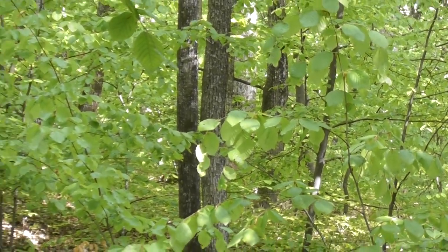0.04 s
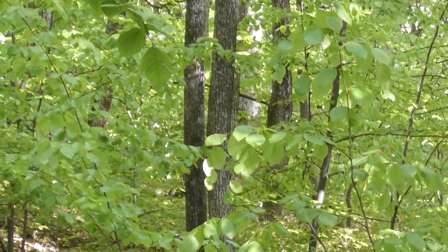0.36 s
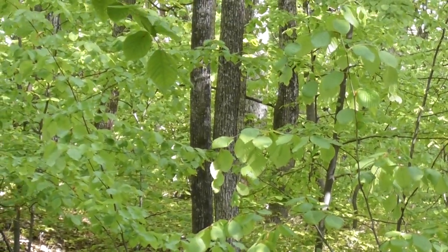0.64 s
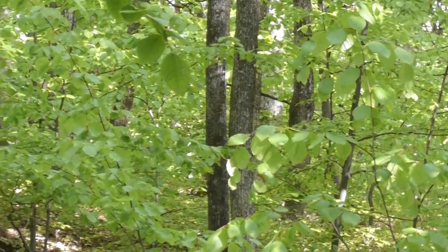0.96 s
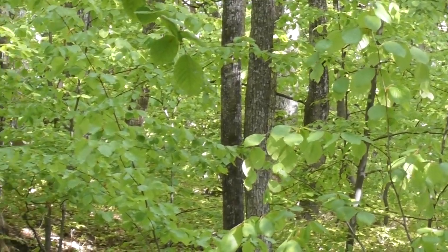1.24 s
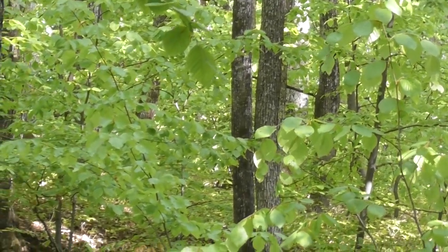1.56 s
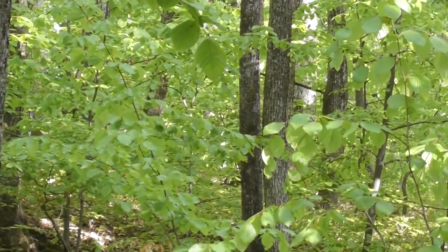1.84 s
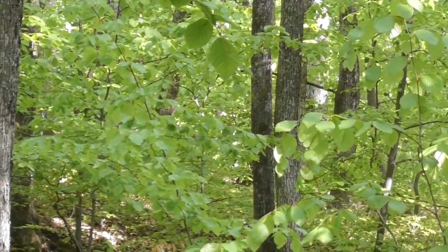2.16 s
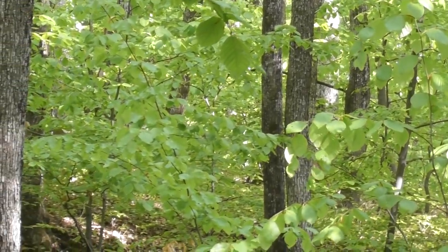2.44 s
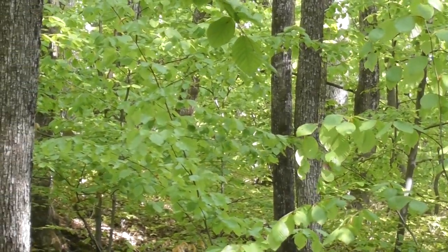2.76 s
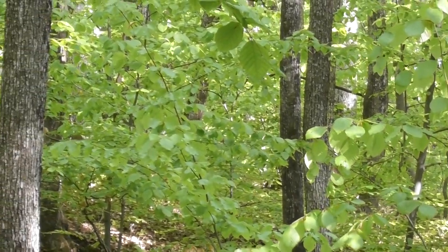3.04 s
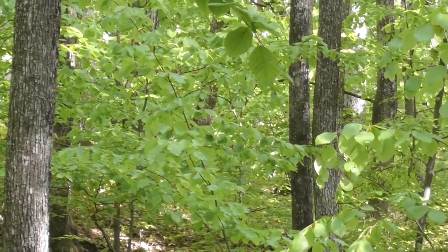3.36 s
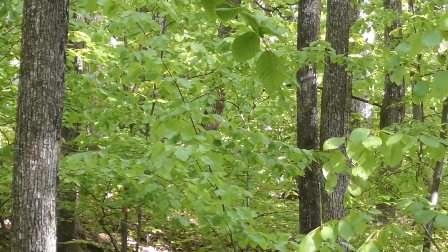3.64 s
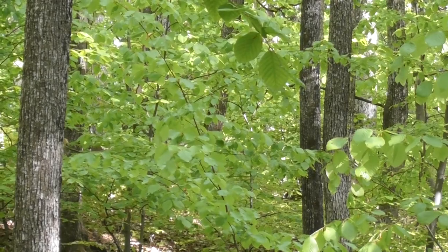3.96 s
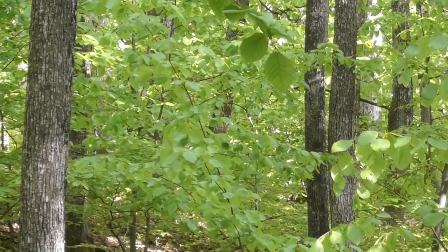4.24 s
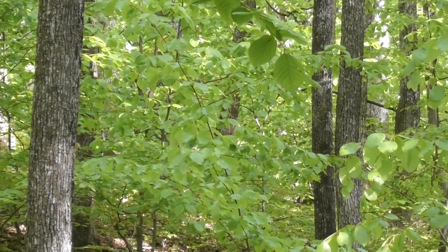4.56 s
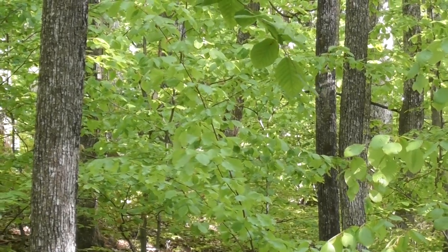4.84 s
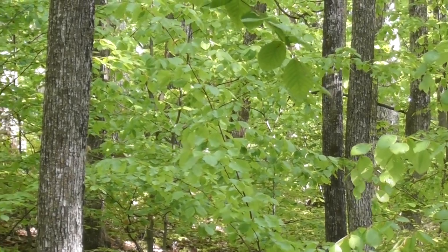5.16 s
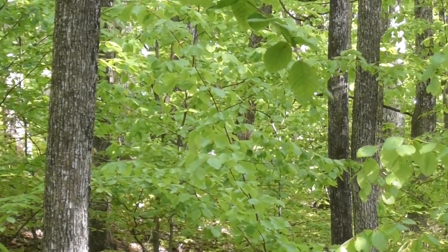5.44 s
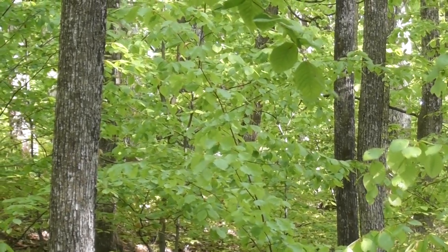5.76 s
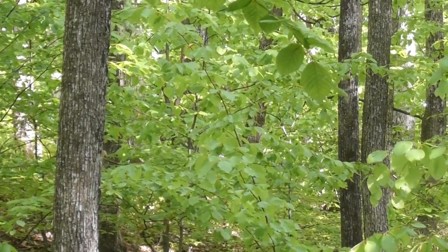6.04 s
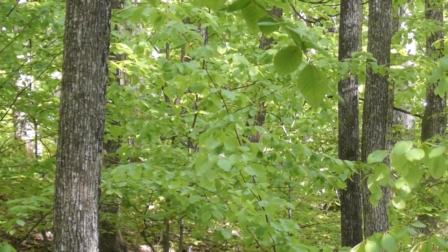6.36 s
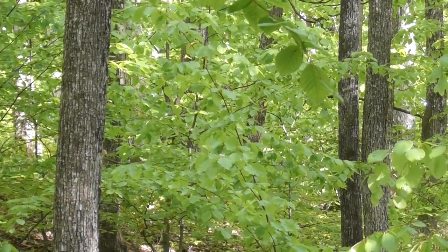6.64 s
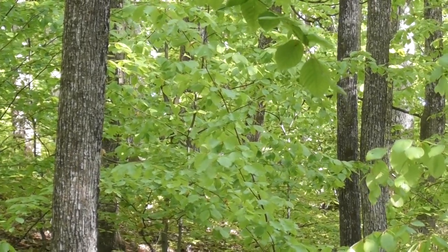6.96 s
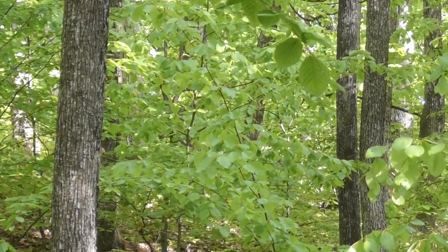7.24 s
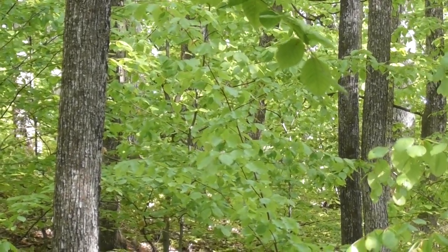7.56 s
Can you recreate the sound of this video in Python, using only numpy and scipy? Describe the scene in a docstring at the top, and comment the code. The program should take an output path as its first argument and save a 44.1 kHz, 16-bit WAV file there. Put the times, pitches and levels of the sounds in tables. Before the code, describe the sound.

Two hoarse, low barks from a far-off deer ring through the woods, one early and one right at the end, louder than everything else. Throughout, one bird gives evenly spaced, rising trilled calls, with faint chips and whistles from other birds around it. A low rumble lies underneath, while tiny dry twig ticks and a faint lens motor buzz sound near the microphone.

```python
"""A deer barks twice, hoarsely, far off in a leafy forest: its vocal folds chop a blast of air that
rings in its throat, and the tree trunks scatter each bark into a long echo. One bird repeats a rising,
trilled call, a smaller one chips, and distant ones whistle and twitter over a low, far rumble.
Close by, leaves and twigs tick and rustle, and the camera's lens motor buzzes faintly in tiny steps."""
import sys
import numpy as np
from scipy import signal
from scipy.fft import rfft, irfft, next_fast_len
from scipy.io import wavfile

SR = 44100
rng = np.random.default_rng(int(sys.argv[2]) if len(sys.argv) > 2 else 0)


def digitize_waveform(pressure):
    """Quantize a signal to 16-bit integers and store it at the path in sys.argv[1].

    Rows of a 2-D input are taken as channels; values are limited to [-1, 1].
    """
    field = np.atleast_2d(pressure).T
    bounded = np.clip(field, -1, 1)
    quanta = np.round(bounded * 32767).astype(np.int16)
    wavfile.write(sys.argv[1], SR, quanta)


N = 334719
TIME = np.arange(N) / SR


def from_db(db):
    """Turn decibels into a number to multiply a sound by."""
    return 10 ** (np.asarray(db) / 20)


def rms_one(x):
    """Scale a sound so that its average strength (rms) is 1."""
    return x / np.sqrt(np.mean(x ** 2) + 1e-20)


def along(rows, at, column=1):
    """Read a column of a table, joining its rows with straight lines."""
    rows = np.array(rows)
    return np.interp(at, rows[:, 0], rows[:, column])


def at_hz(points, hz):
    """Read a table by frequency, giving each octave the same room."""
    points = np.array(points)
    return np.interp(np.log(hz + 1), np.log(points[:, 0]), points[:, 1])


def add(track, start_s, sound):
    """Mix a sound into a track at a given time."""
    start = int(np.clip(round(start_s * SR), 0, N - 1))
    track[start:start + len(sound)] += sound[:N - start]


def drift(rate_hz):
    """A curve that wanders by about 1, reaching a new random value rate_hz times a second."""
    return np.interp(TIME * rate_hz, np.arange(8192), rng.standard_normal(size=8192))


def progress(length_s):
    """A line that runs from 0 to 1 in the given time."""
    return np.linspace(0, 1, int(length_s * SR))


def swell(t, length_s, attack_s, release_s):
    """A loudness curve that rises from 0, holds at 1 and is back at 0 after length_s."""
    return np.clip(np.minimum(t / attack_s, (length_s - t) / release_s), 0, 1)


def spells(rows, at, ramp_s):
    """A loudness curve that is on for each row (start_s, end_s, level_db); the loudest row wins."""
    gains = [from_db(db) * swell(at - start, end - start, ramp_s, ramp_s) for start, end, db in rows]
    return np.max(gains, axis=0)


def tone(hz):
    """A pure tone of average strength 1 that follows a pitch curve."""
    return np.sqrt(2) * np.sin(2 * np.pi * np.cumsum(hz) / SR)


def resonate(x, hz, width_hz):
    """Let a sound ring at one frequency, which passes unchanged while the rest is weakened."""
    r = np.exp(-np.pi * width_hz / SR)
    feedback = [1, -2 * r * np.cos(2 * np.pi * hz / SR), r * r]
    return signal.lfilter(np.array([1, 0, -1]) * (1 - r * r) / 2, feedback, x + 1e-18)


def resonate_twice(x, hz, width_hz):
    """Ring twice over, so that much less gets through away from the peak."""
    return resonate(resonate(x, hz, width_hz), hz, width_hz)


def stereo(mid, side, likeness):
    """Mix two noises into left and right, from unrelated (likeness 0) to the same (1)."""
    alike = np.clip(likeness, 0, 1)
    return np.sqrt(1 + alike) * mid + np.sqrt(1 - alike) * side * np.array([[1], [-1]])


def panned(x, left_db):
    """Make the left channel louder than the right by left_db."""
    return x * from_db(left_db * np.array([[1], [-1]]) / 2)


def stereo_noise(spectrum):
    """Noise from all around with a given tone colour and an average strength of 1."""
    # how alike left and right are: frequency_hz, likeness (0 to 1)
    likeness = [(30, 0.94), (100, 0.94), (220, .99), (330, 0.86), (500, 0.3), (1000, 0.42), (2000, 0.98),
                (4000, 1), (6000, 1), (9000, 0.81), (13000, 0.17)]
    padded = next_fast_len(N)
    mid, side = rfft(rng.standard_normal((2, padded)))
    hz = np.arange(len(mid)) * SR / padded
    coloured = stereo(mid, side, at_hz(likeness, hz)) * from_db(at_hz(spectrum, hz))
    return rms_one(irfft(coloured * 1, padded)[:, :N])


def background(rush_db=-62.0, rush_swell_db=-0.2, hiss_db=-66.0):
    """Far rumble, the soft rush of the woods with a faint steady camera whine, and microphone hiss."""
    # loudness of the two rumble bands: time_s, deep_db, upper_db
    rumble_levels = [(0.0, -46, -44.5), (1.0, -49, -47.5), (2.3, -47.5, -44), (3.1, -46.5, -49),
                     (3.7, -49.0, -45.5), (4.25, -50.5, -51), (4.7, -46, -47.5), (5.6, -45.5, -47),
                     (6.3, -42, -45.5), (7.59, -43.5, -41.5)]
    # tone colour of each of the four noises: frequency_hz, relative_db
    deep_colour = [(15, -36), (28, -7.5), (45, -4.5), (68, 5), (97, 8.5), (125, 2.5), (160, 0),
                   (260, -58.5)]
    upper_colour = [(90, -26), (140, -7), (185, 2.5), (220, 3.5), (255, -3.5), (295, -7.5), (340, -16.5),
                    (450, -50)]
    rush_and_whine_colour = [(200, -11.5), (380, 2.5), (600, -1.5), (850, -4.5), (1200, -12.5), (1680, -21),
                             (1920, -11), (2180, -18.5), (2800, -25), (3600, -15), (4300, -26.5),
                             (6000, -50)]   # the peak near 1.9 kHz is the camera's whine
    hiss_colour = [(2000, -15), (4500, -1.5), (6200, -4.5), (7300, 3.5), (8450, 8), (9400, 3.5),
                   (12000, 3.5), (15700, 4)]
    deep = from_db(along(rumble_levels, TIME)) * stereo_noise(deep_colour)
    upper = from_db(along(rumble_levels, TIME, column=2)) * stereo_noise(upper_colour)
    rush_and_whine = from_db(rush_db + rush_swell_db * drift(2.175)) * stereo_noise(rush_and_whine_colour)
    hiss = from_db(hiss_db) * stereo_noise(hiss_colour)
    return deep + upper + rush_and_whine + hiss


def lens_motor(steps_per_s=50, step_s=0.0052, first_hz=2450, last_hz=1200, detune_share=0.066,
               uneven_db=1.3, rattle_db=-5, blip_db=-2):
    """Each motor step is a tiny falling blip with a little rattle, and leaves the housing ringing."""
    # a quiet creep with louder runs on top: start_s, end_s, drive_db
    runs = [(0, 5.3, -73.5), (0, 0.35, -66.5), (.35, 1.05, -63.5), (2.55, 2.7, -64), (3.55, 4.16, -64.5)]
    # strong and weak steps, repeating in fives: relative_db
    accents = [-6, -2, -7, -3, -3]
    # where the lens housing rings: frequency_hz, width_hz, gain_db
    housing = [(1380, 40, 20), (1900, 85, 7), (2080, 250, 0), (3450, 600, 6)]
    blips, u = np.zeros(N), progress(step_s)
    starts = np.arange(0, TIME[-1] - 1 / steps_per_s, 1 / steps_per_s)
    accent_db = np.resize(accents, len(starts)) + uneven_db * rng.standard_normal(len(starts))
    strengths = spells(runs, starts, ramp_s=.04) * from_db(accent_db)
    shape = np.sin(np.pi * u ** 0.6)
    for start_s, strength, detune in zip(starts, strengths, rng.standard_normal(len(starts))):
        pitch = np.geomspace(first_hz, last_hz, len(u)) * (1 + detune_share * detune)
        add(blips, start_s, strength * shape * tone(pitch))
    rattle = from_db(rattle_db) * np.abs(blips) * rng.standard_normal(N)
    ringing = sum(from_db(db) * resonate(blips + rattle, hz, width) for hz, width, db in housing)
    return from_db(blip_db) * blips + ringing


def leaf_rustles(centre_hz=7200, width_hz=2000, clump_db=4):
    """Leaves brush each other in a fine, clumped crackle."""
    # brief high rustles: start_s, end_s, level_db
    rustles = [(.235, .265, -65), (.285, .34, -65.5)]
    grit = rng.standard_normal(N) * from_db(clump_db * drift(400))
    return spells(rustles, TIME, ramp_s=0.015) * rms_one(resonate_twice(grit, centre_hz, width_hz))


def twig_ticks(rise_s=0.00087, snap_s=0.0012, crumble_db=-24, crumble_s=0.015, clump_db=5,
               width_share=0.36, faint_count=7, faint_db=-51.5, faint_hz=8200):
    """A leaf or twig gives a dry snap, then a weaker crumbling in small clumps."""
    # the main ticks: start_s, peak_db, centre_hz
    main_ticks = [(.081, -48, 8200), (2.699, -51, 2140), (3.331, -52, 8370), (3.721, -48.5, 7600),
                  (4.228, -49.5, 7950), (4.315, -49, 7950), (4.411, -44.5, 7300), (4.424, -52, 8000),
                  (4.636, -44, 7530), (5.828, -46.5, 8570), (5.888, -42.5, 8500)]
    out, t = np.zeros(N), TIME[:SR // 20]
    clumps = from_db(clump_db * drift(400))
    faint_starts = rng.uniform(0, TIME[-1] - t[-1], faint_count)
    ticks = main_ticks + [(start_s, faint_db, faint_hz) for start_s in faint_starts]
    rise = 1 - np.exp(-(t / rise_s) ** 2)
    for (start_s, db, hz), grit in zip(ticks, rng.standard_normal((len(ticks), len(t)))):
        crumble = from_db(crumble_db) * np.exp(-t / crumble_s) * clumps[int(start_s * SR):][:len(t)]
        shape = rise * (np.exp(-t / snap_s) + crumble)
        snap = resonate_twice(grit * shape, hz, width_share * hz)
        add(out, start_s, from_db(db) * snap / np.abs(snap).max())
    return out


def forest_echo(x, direct_db, build_s, fade_s, late_db, late_fade_s, likeness=.95):
    """Echoes off near trunks build up and die away; far trunks return a longer tail."""
    t = TIME[:2 * SR]
    # each fade time is how long that part takes to drop by 60 dB
    fade = from_db(-60 * t / fade_s) + from_db(late_db - 60 * t / late_fade_s)
    build = 1 - np.exp(-t / build_s)
    echo = stereo(*rng.standard_normal((2, len(t))), likeness) * fade * build
    echo = echo / np.sqrt(np.sum(echo ** 2) / 2)
    echo[:, 0] += from_db(direct_db)   # the sound that arrives straight, without a bounce
    return signal.fftconvolve(x[None], echo, axes=1)[:, :N] / np.sqrt(1 + from_db(2 * direct_db))


def twittering_birds(centre_hz=3550, range_hz=850, burst_db=5):
    """Far birds twitter in quick bursts of leaping pitch."""
    # stretches of twittering: start_s, end_s, level_db
    bouts = [(0, 2.1, -76.5), (2.1, 4.3, -82), (6.3, 7.9, -77.5)]
    level = spells(bouts, TIME, ramp_s=0.19) * from_db(burst_db * np.tanh(drift(24)))
    pitch = centre_hz + range_hz * np.tanh(drift(220))
    return level * tone(pitch)


def whistling_bird(warble_hz=72):
    """A distant bird whistles sliding notes with a slight warble."""
    # its notes: start_s, length_s, first_hz, last_hz, level_db
    whistles = [(0.886, 0.076, 1970, 2036, -65.5), (1.141, 0.23, 2327, 2410, -67),
                (1.693, 0.059, 2700, 2280, -67.5), (6.359, 0.32, 2520, 2217, -69.5),
                (6.658, 0.26, 2044, 1930, -64.5), (7.017, 0.28, 2656, 2416, -72),
                (5.104, 0.21, 7170, 7300, -74)]
    out, wobble = np.zeros(N), drift(260)
    for start_s, length_s, first_hz, last_hz, db in whistles:
        u = progress(length_s)
        warble = warble_hz * np.roll(wobble, -int(start_s * SR))[:len(u)]
        pitch = first_hz + (last_hz - first_hz) * u + warble
        add(out, start_s, from_db(db) * signal.windows.tukey(len(u), .6) * tone(pitch))
    return out


def chipping_bird(length_s=0.0338, arch_hz=800, top_at=0.585, quaver_hz=90, scatter_hz=120):
    """Each chip of a small bird sweeps up to a top pitch of its own and drops again, with a quaver."""
    # runs of evenly spaced chips: start_s, end_s, spacing_s, top_hz, level_db
    runs = [(0.56, 1.11, 0.079, 3664, -65), (1.87, 1.925, 0.032, 3900, -63.5),
            (6.192, 6.44, .169, 3520, -63), (6.53, 6.93, .16, 3700, -60)]
    out, u = np.zeros(N), progress(length_s)
    quaver = quaver_hz * drift(600)
    below_top = arch_hz * ((u - top_at) / top_at) ** 2
    for start_s, end_s, spacing_s, top_hz, db in runs:
        for chip_s, stray in zip(np.arange(start_s, end_s, spacing_s), rng.standard_normal(size=16)):
            pitch = top_hz + scatter_hz * stray - below_top + quaver[int(chip_s * SR):][:len(u)]
            add(out, chip_s, from_db(db) * np.sin(np.pi * u) * tone(pitch))
    return out


def trilling_bird(first_hz=3388, lead_hz=190, lead_fall_s=0.0159, lead_s=.018, opening_s=0.0285,
                  trill_hz=56, swing_hz=300, droop=0.355, wobble_hz=55, throb_db=5.0,
                  undertone_gap_hz=430, undertone_db=-13):
    """A thin, falling lead-in opens into a rising trill; a weaker, lower tone grows in and rasps."""
    # its calls: start_s, length_s, last_hz, level_db
    calls = [(.045, 0.21, 3770, -57), (1.203, 0.19, 3740, -55), (2.455, 0.22, 3780, -56.5),
             (3.468, 0.21, 3804, -56), (4.585, .225, 3672, -59.5), (5.627, 0.23, 3690, -58),
             (6.975, .19, 3783, -58)]
    out, wobble = np.zeros(N), drift(300)
    for k, (start_s, length_s, last_hz, db) in enumerate(calls):
        u = progress(length_s)
        t = u * length_s
        opening = 1 - np.exp(-np.maximum(t - lead_s, 0) / opening_s)
        cycle = 2 * np.pi * trill_hz * t
        trill = signal.sawtooth(cycle, .7) * opening
        glide = first_hz + (last_hz - first_hz) * u ** 1.2 + lead_hz * np.exp(-t / lead_fall_s)
        swing = swing_hz * (trill - droop * trill ** 2)   # reaches further down than up
        pitch = glide + swing + wobble_hz * opening * wobble[k * SR:][:len(u)]
        throb = -throb_db * opening * np.cos(cycle)   # loudest late in each upward swing
        level = from_db(db + throb) * swell(t, length_s, attack_s=0.047, release_s=0.025)
        undertone = from_db(undertone_db) * u * tone(pitch - undertone_gap_hz)
        add(out, start_s, level * (tone(pitch) + undertone))
    return out


def barking_deer(flutter_hz=105, jitter=0.121, rasp=0.71, widen=1.35, attack_s=0.081, release_s=.04,
                 muzzle_opens_s=0.15, muzzle_edge_hz=1700, muzzle_lift_db=1.2):
    """Air, chopped by unevenly flapping vocal folds, rings the throat; the opening muzzle adds treble."""
    # the two barks: start_s, length_s, level_db
    barks = [(1.903, 0.372, -43), (7.477, 0.39, -45.5)]
    # where the throat and muzzle ring: frequency_hz, base_width_hz, gain_db
    throat = [(474, 142, -5.5), (594, 136, 1.5), (704, 155, -1.5), (860, 73, -5), (1010, 185, -5.5),
              (1242, 140, -5), (1460, 260, -17.5), (1914, 260, -19.5), (2160, 395, -19.5), (3150, 370, -34)]
    flaps = tone(flutter_hz * (1 + jitter * drift(90)))
    air = rng.standard_normal(N) * (1 + rasp * flaps)
    rings = [(-1) ** k * from_db(db) * resonate_twice(air, hz, widen * width)
             for k, (hz, width, db) in enumerate(throat)]
    effort, muzzle = np.zeros((2, N))
    for start_s, length_s, db in barks:
        effort += from_db(db) * swell(TIME - start_s, length_s, attack_s, release_s)
        muzzle += from_db(muzzle_lift_db) * swell(TIME - start_s, length_s, muzzle_opens_s, release_s)
    # the muzzle opens more slowly than the bark swells, so the high rings come out later
    voice = sum(ring * (muzzle if hz > muzzle_edge_hz else 1) for ring, (hz, _, _) in zip(rings, throat))
    return effort * voice / np.std(sum(rings))


def scene():
    """Animals at their distances in the forest, with small sounds near the microphone."""
    # the trilling bird moves towards the middle as the camera turns: time_s, left_minus_right_db
    call_pan = [(0, -2.2), (7, -.7)]
    # the deer stands to the right behind leaves, so it is heard mostly as echo
    barks = forest_echo(barking_deer(), direct_db=-13, build_s=0.0098, fade_s=1.85,
                        late_db=-8.5, late_fade_s=3.24, likeness=.9)
    calls = forest_echo(trilling_bird(), direct_db=-5.0, build_s=0.01, fade_s=0.96,
                        late_db=-22, late_fade_s=1.5)
    chips = forest_echo(chipping_bird(), direct_db=3.0, build_s=0.005, fade_s=0.93,
                        late_db=-15.0, late_fade_s=2.9)
    far_birds = forest_echo(whistling_bird() + twittering_birds(), direct_db=-1.0, build_s=0.011,
                            fade_s=1.0, late_db=0, late_fade_s=3.4)
    animals = panned(barks, left_db=-2.6) + panned(calls, along(call_pan, TIME)) + chips + far_birds
    return animals + twig_ticks() + leaf_rustles() + lens_motor() + background()


def record(dry):
    """The microphone weakens one narrow band, and the highest treble is cut off steeply."""
    # the band that the microphone hears poorly: centre_hz, width_hz, depth (0 to 1)
    mic_dip = (5080, 750, .55)
    centre_hz, width_hz, depth = mic_dip
    cutoff_hz = 15700
    hollowed = dry - depth * resonate(dry, centre_hz, width_hz)
    return signal.sosfilt(signal.ellip(12, .1, 70, cutoff_hz, fs=SR, output="sos"), hollowed)


dry = scene()
out = record(dry)
digitize_waveform(out)
```